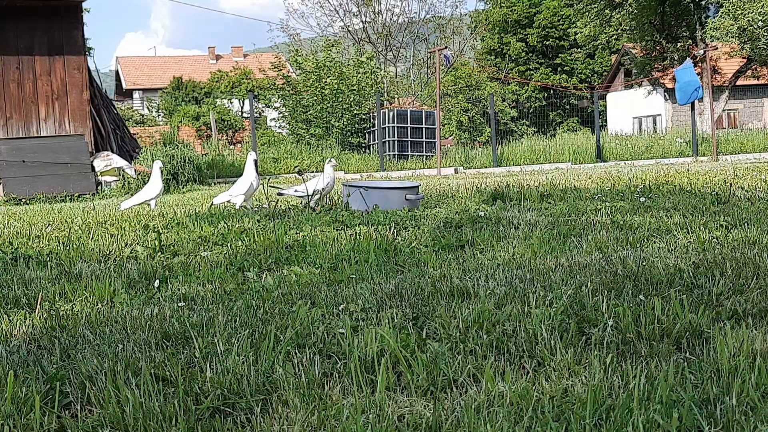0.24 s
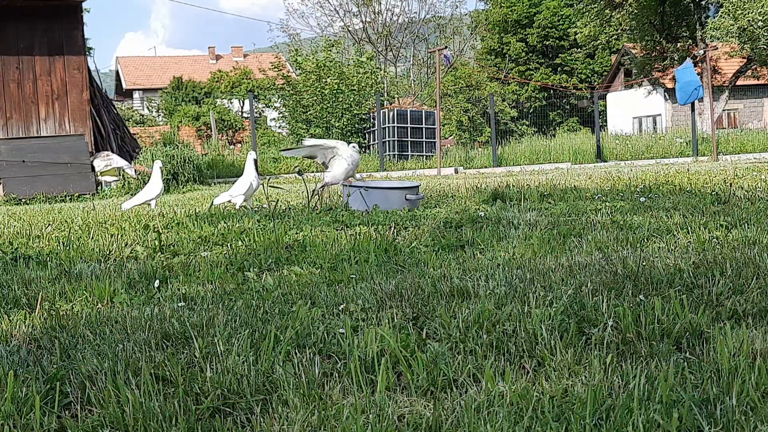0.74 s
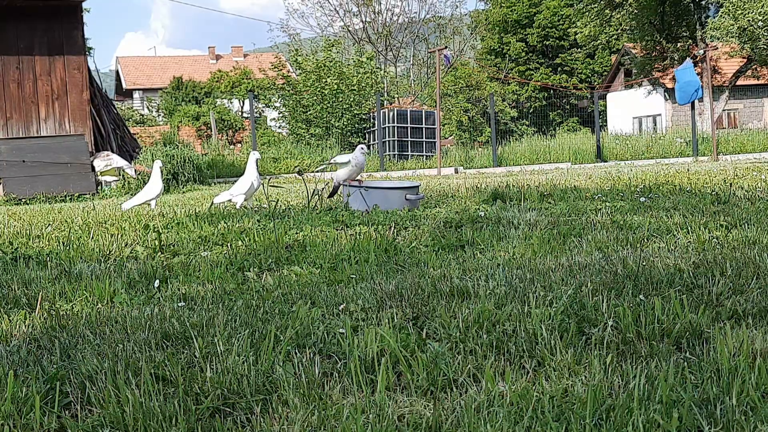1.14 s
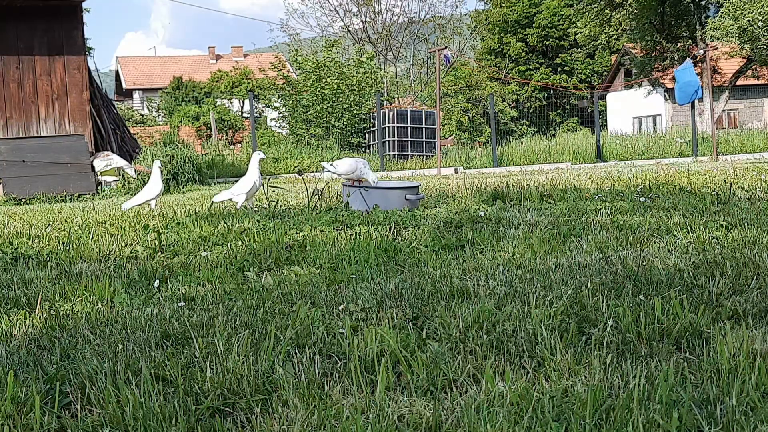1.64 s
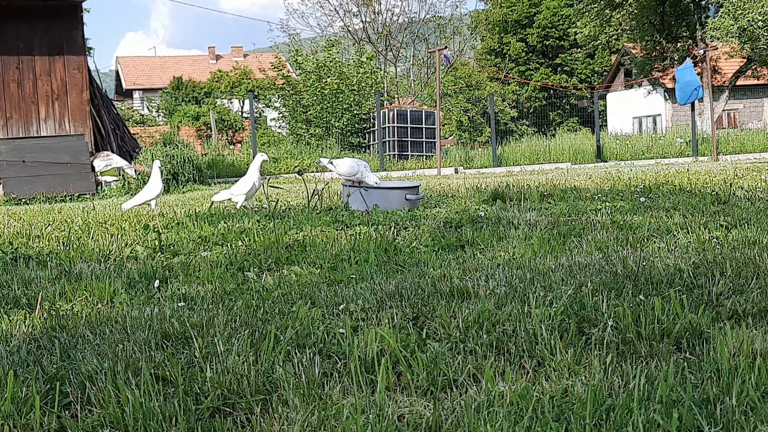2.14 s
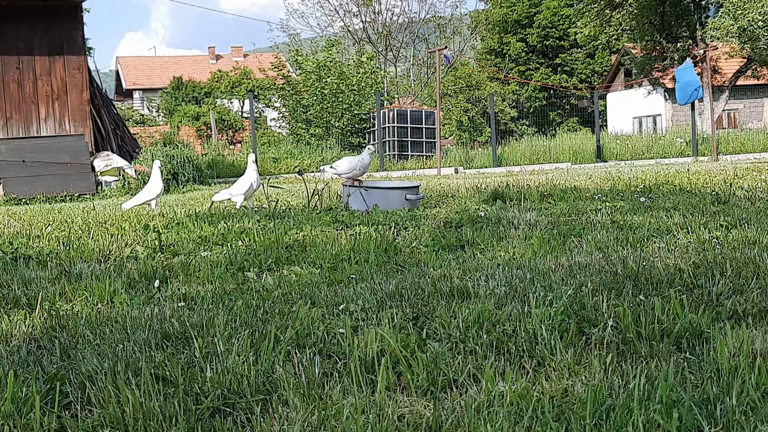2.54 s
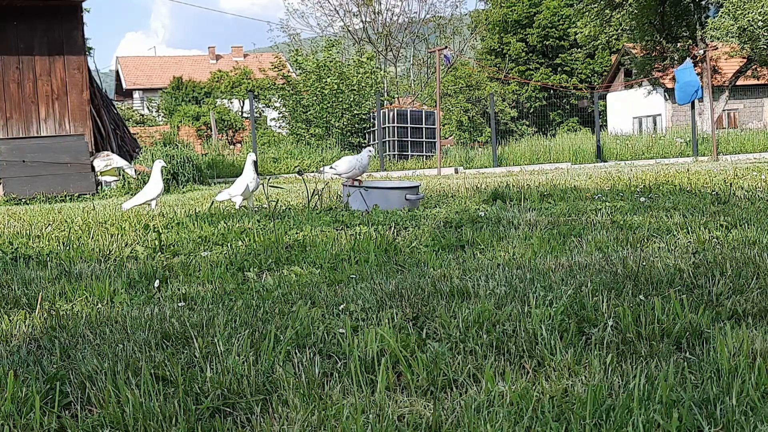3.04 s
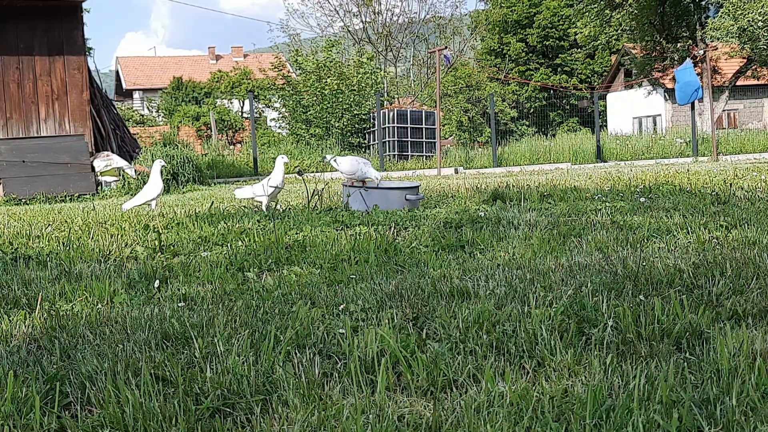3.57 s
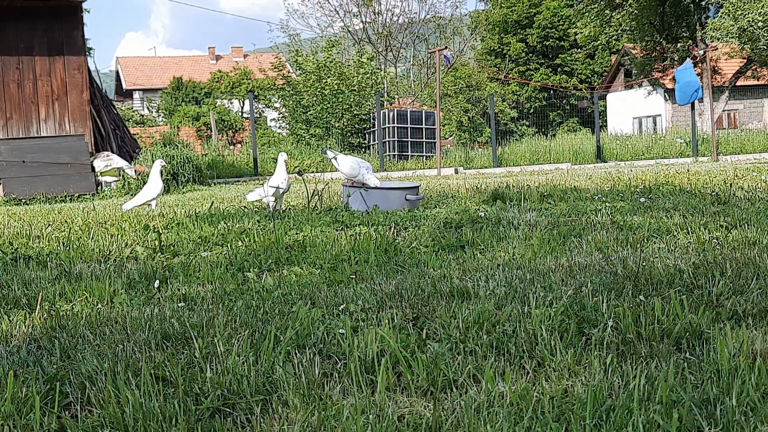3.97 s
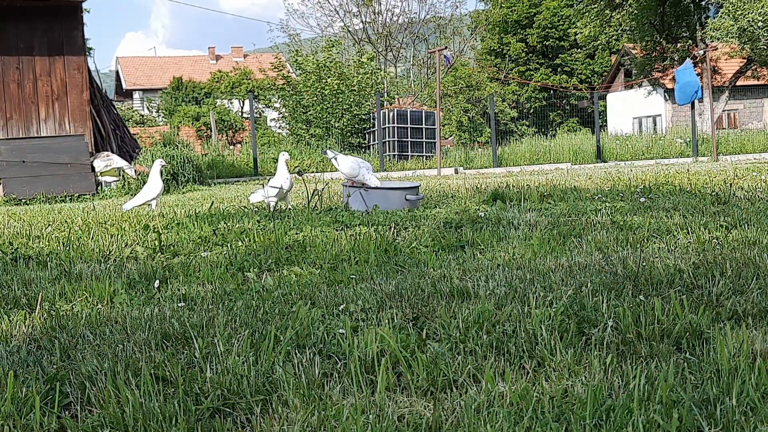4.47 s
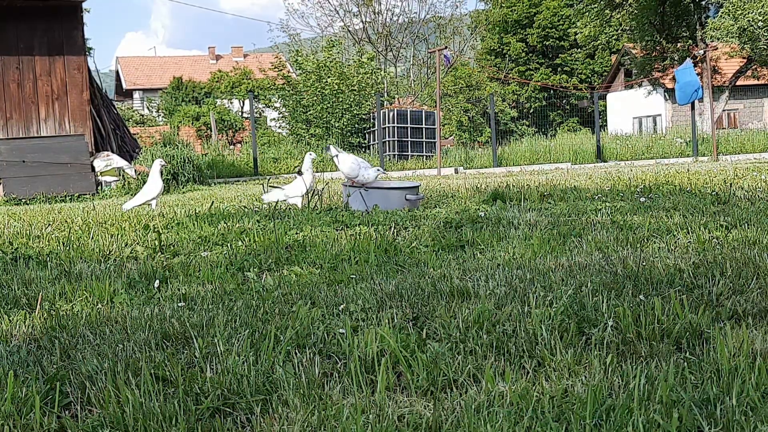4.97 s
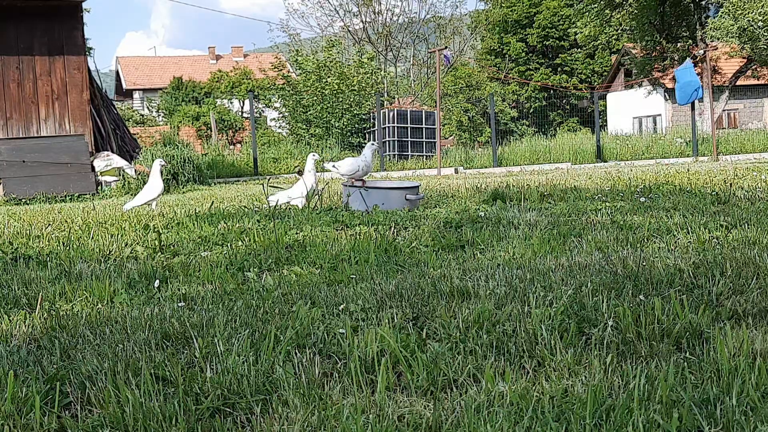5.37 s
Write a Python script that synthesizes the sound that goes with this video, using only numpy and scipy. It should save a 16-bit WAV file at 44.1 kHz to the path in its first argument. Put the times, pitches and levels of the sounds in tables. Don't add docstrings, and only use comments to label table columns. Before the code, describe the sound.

Two distant engines throb unevenly over a deep road rumble as pigeons make soft, low bumps and brief muffled coos. Faint crickets pulse on the left; a far songbird repeats a quick whistle on the right. A sparrow chirps at one and four seconds, grass snaps between them, a tub is knocked at mid-clip, then rustling and hollow thumps close it. Open yard, stereo phone microphone.

```python
import sys
import numpy as np
from scipy import signal
from scipy.fft import rfft, irfft
from scipy.io import wavfile
from scipy.ndimage import uniform_filter1d

SR = 44100
rng = np.random.default_rng(int(sys.argv[2]) if len(sys.argv) > 2 else 0)


def natural_amplitude(level_db):
    exponent = np.asarray(level_db, float) / 20
    return 10 ** exponent


def store_pcm(level_fs):
    pcm = np.round(np.clip(level_fs, -1, 1) * 32767).astype(np.int16)
    wavfile.write(sys.argv[1], SR, np.atleast_2d(pcm).T)


N = 247401
TIME = np.arange(N) / SR

# start in seconds, peak in dB, pitch in Hz.
BUMPS = [(0.35, -52.5, 287), (0.385, -61, 275), (0.734, -51.5, 335), (0.674, -52, 252), (0.832, -54, 249),
         (.57, -53, 286), (1.501, -52, 305), (1.808, -52, 294), (1.935, -52.5, 323), (1.934, -62, 402),
         (2.0, -53.5, 287), (2.202, -55, 452), (2.245, -54.5, 437), (2.47, -61.5, 420), (2.6, -54.5, 294),
         (2.78, -59.5, 290), (2.296, -52.5, 293), (3.129, -55, 289), (3.241, -56, 288), (3.35, -53, 397),
         (3.369, -63, 284), (3.389, -46.5, 284), (3.635, -52.5, 311), (4.01, -57.5, 315), (4.081, -71, 400),
         (4.129, -54, 265), (3.729, -45.5, 310), (4.367, -55, 290), (5.281, -62.5, 492),
         (5.309, -53.5, 271), (5.385, -58, 420), (5.57, -53, 318), (5.52, -55, 313.6)]
BUMP_CYCLES = 6.14
# start in seconds, length in seconds, level in dB, first and last pitch in Hz.
COOS = [
    (0.092, 0.07, -70, 288, 290),
    (0.166, 0.063, -61.5, 279, 313),
    (0.362, 0.066, -68, 308, 414),
    (0.743, 0.069, -63, 334, 445),
    (0.803, 0.074, -65, 448.5, 346),
    (1.432, 0.099, -68, 265, 301),
    (2.11, 0.104, -56, 352.7, 232.5),
    (2.205, 0.11, -59, 239.4, 275),
    (3.675, .07, -59.5, 292, 310),
]
# peak time in seconds, peak in dB, pitch in Hz, half-length in seconds, octave level in dB.
THUMPS = [
    (3.331, -44, 378, .007, -14),
    (3.439, -47, 322, .009, -23),
    (5.293, -53, 347, 0.0077, -25),
    (5.321, -52, 290, 0.0089, -25),
    (5.393, -50, 345, 0.0087, -29),
    (5.413, -52, 350, .007, -27),
    (5.501, -47.5, 315, 0.0093, -26),
]
# start in seconds, peak in dB, pitch in Hz.
KNOCK = [
    (3.324, -57, 700),
]

# time in seconds, pitch in Hz, level in dB, throat resonance in Hz, pitch scatter from 0 to 1.
CHIRPS = [
    [(.97, 1180, -82, 4300, .03), (.992, 1370, -63, 4400, .03), (1.009, 1580, -56, 4600, .022),
     (1.017, 1760, -57, 4100, .01), (1.028, 1780, -52, 3800, .008), (1.031, 1430, -53, 3900, .012),
     (1.038, 1330, -62, 3800, .03), (1.047, 1210, -59, 3700, .025), (1.067, 1370, -58, 4200, .016),
     (1.092, 1140, -62, 3100, .03), (1.112, 1100, -76, 2800, .04)],
    [(4.052, 1500, -80, 4900, .04), (4.07, 1500, -60, 4900, .032), (4.082, 1440, -57, 4700, .03),
     (4.1, 1530, -55, 4500, .022), (4.114, 1700, -55, 4200, .018), (4.127, 1420, -58, 3200, .02),
     (4.14, 1230, -61, 3300, .045), (4.158, 1300, -62, 3300, .05), (4.176, 1150, -60, 3000, .03),
     (4.2, 1150, -74, 3000, .05)],
    [(.915, 1300, -86, 2700, .01), (.925, 1450, -76, 3000, .01), (.94, 1850, -75, 3600, .01),
     (.96, 1750, -86, 3500, .02)],
]
CHIRP_WIDTH_HZ, CHEEP_WIDTH_HZ = 1300, 790
# share of its length, pitch over top pitch, level in dB.
CHEEP = [
    (0, .86, -6),
    (.15, .88, -2),
    (.55, 1.0, 0),
    (1, .92, -9),
]
# start in seconds, length in seconds, level in dB, top pitch in Hz,
# multiple of the pitch on which the throat rings.
CHEEPS = [
    (2.64, 0.12, -74, 1300, 3.0),
    (3.99, .06, -84, 1800, 3.0),
    (4.2, .06, -78, 1320, 2.5),
    (5.2, 0.12, -80, 1300, 3.0),
]
CHEEP_SCATTER, SPARROW_FIRST = .035, .5
SPARROW_RASP, SPARROW_BURR, BURR_HZ, SPARROW_HALF = .1, .3, 165, .35
SPARROW_BREATH_DB, BREATH_HZ, BREATH_WIDTH_HZ = -9, 4000, 3600
LINE_PATCHY_DB = 2.5
# frequency in Hz, left level in dB, right level in dB.
SHADE = [(1400, 3, 1), (2500, 4.5, -4), (3200, 2, 0), (3700, 0, 2), (4300, -1.5, 1), (4900, -5, -2.5),
         (6000, -7, -3)]
SHED_S = .066
# level in dB, for the left port and then the right.
SHED_DB = [
    [-8],
    [-17],
]

# seconds after its start, pitch in Hz, level in dB.
PHRASE = [
    (-.04, 4720, -23),
    (.02, 4900, -15.5),
    (.04, 5050, -7),
    (.053, 5600, -10),
    (.067, 4300, -6.5),
    (.08, 5270, 0),
    (.088, 4700, -29),
    (.098, 4370, -6),
    (.112, 4060, -16),
]
# start in seconds, level in dB.
SONGS = [
    (0.57, -65),
    (1.401, -63.5),
    (2.187, -67.5),
    (3.075, -70.5),
    (4.76, -72.5),
]
SONG_RASP = .4

# start in seconds, peak in dB.
CRICKET = [(-.065, -79), (0.1776, -80), (0.4391, -78.5), (0.7091, -78.5), (1.3599, -77.5), (1.5961, -77.5),
           (1.8656, -76.5), (2.0965, -79.5), (2.371, -78.5), (2.6382, -76.5), (2.9148, -77), (3.1894, -76),
           (3.472, -78), (3.7587, -76.5), (3.9988, -78), (4.3161, -77), (4.618, -80.5), (4.8983, -75.5),
           (5.1406, -77)]
# start in seconds, peak in dB.
CRICKET_FAR = [(0.0093, -80), (0.2803, -76), (0.7766, -77), (1.6194, -74), (1.8861, -78), (2.1176, -90),
               (2.5294, -80), (3.3194, -80), (3.5694, -77), (3.8494, -80), (4.801, -78), (4.9841, -77)]
CRICKET_WARMING_HZ_PER_S, CRICKET_RASP = 26, .22
CRICKET_FALL, CRICKET_HUM = .15, .3

# start in seconds, peak in dB, pitch in Hz, left minus right in dB.
TICKS = [(0.8789, -66, 12500, 4), (1.1223, -69, 10170, 7), (1.502, -67, 8000, 19), (1.5158, -57, 8100, 20),
         (1.525, -62, 8000, 15), (1.533, -61, 7800, 15), (1.538, -62, 7400, 15), (1.549, -71, 8000, 15),
         (1.57, -65, 10200, 9), (1.5775, -56, 12000, 13), (1.5985, -59, 10500, 8), (3.2959, -67, 5500, 2.5),
         (3.3173, -61, 12800, 6), (3.3278, -64, 11800, 4), (3.375, -68, 11800, 8), (4.0367, -67, 11500, 16),
         (4.418, -67, 10600, 10), (4.419, -60, 4300, 12), (4.981, -61.5, 6470, 14),
         (5.0793, -62.5, 10800, 19), (5.1947, -63, 13000, 12), (5.2141, -62, 7800, 19),
         (5.3034, -63, 8600, 16), (5.3604, -57.5, 8250, 25), (5.3602, -63, 12500, 11),
         (5.4341, -60.5, 9960, 21), (5.4644, -62, 8630, 15), (5.545, -65, 7240, 22)]
TICK_S, TICK_BROAD = .0016, .35
# time in seconds, level in dB.
RUSTLE = [
    [(0, -77), (.02, -94), (.05, -95)],
    [(1.49, -95), (1.515, -72), (1.55, -75), (1.6, -80), (1.68, -89)],
    [(3.28, -91), (3.324, -86), (3.38, -87), (3.45, -87)],
    [(3.56, -101), (3.6, -85), (3.8, -87.5), (3.95, -97)],
    [(4.03, -86), (4.12, -76), (4.25, -91)],
    [(4.95, -84), (4.985, -81), (5.02, -84), (5.075, -86), (5.085, -72.5), (5.13, -86), (5.19, -86)],
    [(5.19, -84), (5.224, -71.5), (5.27, -81), (5.33, -74), (5.375, -76), (5.395, -72), (5.45, -74),
     (5.48, -80)],
    [(5.48, -75), (5.545, -73.5), (5.575, -81.5), (5.61, -87)],
]
# pitch in Hz, width in Hz, level in dB.
BLADES = [(4870, 4000, 5.5), (7070, 2100, 1), (10100, 5200, -7), (12600, 6300, 1)]
BLADE_PATCHY_DB = 1.5
# time in seconds, level in dB.
SQUEAK = [
    (1.498, -92),
    (1.503, -86),
    (1.517, -66),
    (1.535, -82),
    (1.553, -85),
]
# pitch in Hz, width in Hz, level in dB.
STALK = [(3870, 470, -3.5), (8000, 270, 0), (10300, 420, -6)]

# time in seconds, level of the firing tone in dB,
# load as the level of the upper multiples over it in dB.
TRUCK = [(0, -41, -16), (.3, -50, -15.5), (.62, -44.5, -8), (1.0, -50, -14), (1.3, -62.5, -13),
         (1.6, -43.5, -16.5), (1.88, -48.5, -5), (2.12, -56.5, -7.5), (2.62, -50.5, -6.5),
         (2.83, -64.5, -7), (3.28, -49.5, -2), (3.45, -45.5, -24), (3.65, -44.5, -6), (4.02, -39.5, -18.5),
         (4.25, -54.5, 2), (4.65, -58.5, 0.5), (5.02, -42.5, 0), (5.61, -54.5, 10)]
# time in seconds, pitch in Hz.
TRUCK_HZ = [(0, 57.6), (2, 57), (4, 58), (5, 56.8), (5.61, 56.5)]
# time in seconds, depth in dB.
FADES = [(0.097, -36), (.26, -10), (.42, -20), (1.12, -5), (1.71, -41), (2.069, -3), (3.0, -5), (3.52, -13),
         (4.19, -28), (4.55, -6), (5.1, -5), (5.33, 0)]
TRUCK_THIRD_DB, TRUCK_THIRD_SHARE = -6, .85
# time in seconds, level of the firing tone in dB, 2nd multiple over it in dB.
TRACTOR = [(0, -68, -11), (.58, -71, 12), (1.09, -58.5, -12.5), (1.22, -73, 20), (1.38, -66, -4),
           (1.47, -59, 6), (1.64, -54.5, -24), (1.73, -58.5, -12), (1.94, -52, -21), (2.03, -57.5, -12),
           (2.4, -55, 2.5), (2.66, -53, -9), (2.82, -62, -1.5), (3.3, -53.5, 4.5), (3.55, -53.5, -3.5),
           (4.35, -54, 3.5), (4.66, -55, -1), (5.61, -50.5, -2.5)]
# multiple of the firing tone, level over that tone in dB.
TRACTOR_EXTRA = [(1.5, -10.5), (2.5, -14.5), (3, -18)]
# time in seconds, depth in dB.
TRACTOR_FADES = [(.13, -2), (.43, -18), (1.04, -20), (1.36, -9), (1.58, -17), (2.2, -7), (3.0, 5),
                 (3.9, -7), (2.78, 0), (4.22, -9), (4.66, -6), (5.5, 0)]
TRACTOR_HZ, FADE_S, TRACTOR_FADE_S, ENGINE_WET_DB = 93., .038, .025, -22

# time in seconds, level in dB, pitch in Hz.
TREAD = [
    (2.3, -85, 1010),
    (2.5, -74.5, 1010),
    (2.6, -67, 960),
    (2.69, -63, 910),
    (2.77, -75, 900),
    (2.87, -67.5, 950),
    (2.94, -75, 960),
    (3.01, -74, 950),
    (3.15, -80, 980),
]
TREAD_WIDTH_HZ = 230
# nearest time in seconds, roar in dB, half-time in seconds, hiss over roar in dB.
CARS = [
    (0.0, -81.5, 0.0062, 11),
    (1.04, -71.5, 0.024, -1),
    (1.45, -74, 0.086, -6.5),
    (2.1, -76, 0.51, 2.5),
    (2.85, -71, 0.39, -6),
    (3.3, -71, 0.16, -0.5),
    (3.82, -71.5, 0.2, 1.5),
    (4.12, -72, 0.11, 2),
    (4.7, -71.5, 0.53, -3.5),
    (5.55, -73, 0.15, 1.5),
]
BOOM_DB, BOOM_UNDER_BUMP_DB, BOOM_S = -77.5, -16.5, .097
# frequency in Hz, level in dB per Hz.
BOOM = [(120, -65), (230, -14.5), (310, -3), (430, -8.5), (520, -14), (900, -63)]
ROAR = [(300, -84), (600, -8.5), (820, -7.5), (940, -4.5), (1080, -2.5), (1400, -15), (3000, -80)]
HISS = [(500, -70), (1000, -13), (1400, -2), (1700, -3.5), (2300, -12.5), (3000, -23), (5000, -50)]
# frequency in Hz, level in dB per Hz.
RUMBLE = [(15, -51), (25, -25), (59, 1), (86, -2.5), (179, -3.5), (199, -5.5), (230, -18.5), (289, -9),
          (372, -24), (600, -28.5), (780, -39), (1320, -120)]
# frequency in Hz, level in dB per Hz.
AIR = [(260, -24), (450, -2.5), (682, -5), (1020, -1), (1330, -5.5), (1660, -6), (3050, -23.5), (3590, -19),
       (3980, -21), (4480, -20), (5120, -24.5), (5590, -24.5), (9680, -28), (13400, -22), (15600, -23.5)]
RUMBLE_DB, RUMBLE_FLICKER_DB, AIR_DB = -54.5, 1.5, -70.5
# frequency in Hz, likeness from 0 to 1.
ALIKE = [(60, 0.94), (130, 0.95), (290, 0.74), (640, 0.44), (1400, 0.51), (2400, 0.12), (4000, 0.37),
         (8000, 0)]
# frequency in Hz, left minus right in dB.
LEAN = [(60, 11.5), (110, 4), (200, 5.5), (380, 4), (700, -4), (1290, 2), (2380, 8.5), (4400, 0.5),
        (8120, 1.5), (15000, 1.5)]
# frequency in Hz, lead in milliseconds.
PORT_LAG = [(100, 0.16), (430, 0.3), (1200, 0.43), (2400, 0.418)]


def band(x, hz, width_hz):
    edges = [hz - width_hz / 2, min(hz + width_hz / 2, .49 * SR)]
    return signal.sosfilt(signal.butter(1, edges, "band", fs=SR, output="sos"), x)


def lowpass(x, hz):
    return signal.sosfilt(signal.butter(2, hz, fs=SR, output="sos"), x)


def unit(x):
    return x / np.sqrt(np.mean(x ** 2))


def sine(hz):
    return np.sin(2 * np.pi * np.cumsum(hz) / SR)


def sides(pan_db):
    return natural_amplitude(np.array([[pan_db], [-pan_db]]) / 2)


def walk(rate):
    k = int(SR / rate)
    held = np.repeat(rng.standard_normal(N // k + 1), k)
    return 1.503 * uniform_filter1d(uniform_filter1d(held, k), k)[:N]


def rasp(rate_hz, share):
    return 1 - share + share * walk(rate_hz)


def curves(table):
    s, *columns = np.transpose(table)
    return [np.interp(TIME, s, c) for c in columns]


def sung(table, s0=0.):
    s, *columns = np.transpose(table)
    t = np.arange(s[0], s[-1], 1 / SR)
    return s0 + s[0], t, [np.interp(t, s, c) for c in columns]


def over(hz, table):
    table = np.array(table)
    return np.interp(np.log(hz + 1), np.log(table[:, 0]), table[:, 1])


def add(out, s, piece):
    i = int(s * SR)
    out[..., i:i + piece.shape[-1]] += piece[..., :N - i]


def place(x, pan_db, lag_ms, wet_db, t60):
    t = np.arange(int(.5 * SR)) / SR
    noise = rng.standard_normal((2, len(t)))
    dull = lowpass(noise, 4200)
    tail = dull + (noise - dull) * np.exp(-t / .076)
    tail = tail * np.exp(-np.log(1000) * t / t60) * (t > .006)
    tail *= natural_amplitude(wet_db) / np.sqrt(np.sum(tail ** 2, axis=1, keepdims=True))
    late = np.interp(TIME - abs(lag_ms) / 1000, TIME, x)
    direct = np.array([late, x] if lag_ms > 0 else [x, late]) * sides(pan_db)
    return direct + signal.fftconvolve(x[None], tail, axes=1)[:, :N]


def diffuse(colour):
    hz = np.fft.rfftfreq(N, 1 / SR)
    alike = np.clip(over(hz, ALIKE), 0, 1)
    lean = natural_amplitude(over(hz, LEAN) / 2)
    left, other = rfft(rng.standard_normal((2, N))) * natural_amplitude(over(hz, colour))
    lag = np.exp(-2j * np.pi * hz * over(hz, PORT_LAG) / 1000)
    right = alike * left * lag + np.sqrt(1 - alike ** 2) * other
    return unit(irfft(np.array([left * lean, right / lean]), N))


def bumps():
    out, t = np.zeros(N), np.arange(int(.2 * SR)) / SR
    for s, db, hz in BUMPS:
        length = BUMP_CYCLES / hz
        shape = np.e * t / length * 2 * np.exp(-2 * t / length)
        tone = shape * np.sin(2 * np.pi * hz * t)
        overtone = .089 * shape ** 2 * np.sin(2 * np.pi * 2.1 * hz * t)
        add(out, s, natural_amplitude(db - 2) * (tone + overtone))
    return out


def coos():
    out = np.zeros(N)
    for s, length, db, from_hz, to_hz in COOS:
        share = np.arange(0, 1, 1 / (length * SR))
        turn = 2 * np.pi * np.cumsum(from_hz + (to_hz - from_hz) * share) / SR
        swell = np.sin(np.pi * share) ** .33
        add(out, s, natural_amplitude(db + 3.5) * swell * (np.sin(turn) + .064 * np.sin(2 * turn)))
    return out * rasp(90, .35)


def thumps():
    out = np.zeros(N)
    for s, db, hz, half, octave_db in THUMPS:
        turn = 2 * np.pi * hz * (TIME - s)
        swell = np.exp(-((TIME - s) / half) ** 2)
        out += natural_amplitude(db) * swell * (np.sin(turn) + natural_amplitude(octave_db) * np.sin(2 * turn))
    return out


def pigeons():
    return place(bumps() + coos() + thumps(), 4.6, -.26, -10, .11)


def knock():
    out, t = np.zeros(N), np.arange(int(.06 * SR)) / SR
    for s, db, hz in KNOCK:
        burst = rng.standard_normal(len(t)) * t / .0044 * np.exp(1 - t / .0045)
        add(out, s, natural_amplitude(db + 14.5) * band(band(burst, hz, 720), hz, 700))
    return place(out, 3.4, -.34, -2, .36)


def calls():
    loud = [[row + (CHIRP_WIDTH_HZ,) for row in chirp] for chirp in CHIRPS]
    soft = []
    for s, length, db, top_hz, ring in CHEEPS:
        soft.append([(s + share * length, top_hz * pitch, db + gain_db, ring * top_hz * pitch,
                      CHEEP_SCATTER, CHEEP_WIDTH_HZ) for share, pitch, gain_db in CHEEP])
    return loud + soft


def sparrow_voice():
    out = np.zeros(N)
    for call in calls():
        s, t, (hz, db, throat_hz, scatter, width_hz) = sung(call)
        n = len(t)
        hz = hz * (1 + scatter * walk(400)[:n])
        turn = 2 * np.pi * np.cumsum(hz) / SR + .11 * np.sin(2 * np.pi * BURR_HZ * t)
        half_line = SPARROW_HALF * (throat_hz / 4000) ** 3 * (scatter / .031) ** 2
        voice = SPARROW_FIRST * np.sin(turn)
        for k in np.arange(2, 13) / 2:
            throat = .013 + 1 / (1 + ((k * hz - throat_hz) / width_hz) ** 4)
            line = np.sin(k * turn) * natural_amplitude(LINE_PATCHY_DB * walk(219)[:n]) * throat
            voice = voice + line * (half_line if k % 1 else 1)
        breath = rng.standard_normal(n)
        for _ in range(3):
            breath = band(breath, BREATH_HZ, BREATH_WIDTH_HZ)
        voice = voice + natural_amplitude(SPARROW_BREATH_DB) * unit(breath)
        add(out, s, natural_amplitude(db) * voice * (1 + SPARROW_BURR * np.sin(2 * np.pi * BURR_HZ * t + 1)))
    return out * rasp(500, SPARROW_RASP)


def sparrow():
    x = place(sparrow_voice(), -3.5, .404, -9.5, .38)
    echo = natural_amplitude(np.array(SHED_DB)) * np.roll(x, int(SHED_S * SR), axis=1)
    hz, *ports = np.transpose(SHADE)
    bins = np.fft.rfftfreq(N, 1 / SR)
    colour = natural_amplitude(np.array([over(bins, np.transpose([hz, db])) for db in ports]))
    return irfft(rfft(x + echo) * colour, N)


def songbird():
    out = np.zeros(N)
    for (start, level_db), vary in zip(SONGS, rng.standard_normal(len(SONGS))):
        s, t, (hz, db) = sung(PHRASE, start)
        trill = 1 + .068 * (t < .065) * np.sin(2 * np.pi * 95 * t)
        add(out, s, natural_amplitude(level_db + db) * sine(hz * (1 + .0058 * vary) * trill))
    return place(out * rasp(450, SONG_RASP), -10.5, .24, -1.5, .49)


def cricket(chirps, song_hz, span, stroke_hz, rise, scatter):
    out, t = np.zeros(N), np.arange(int(.3 * SR)) / SR
    stroke = t * stroke_hz % 1
    swell = np.clip(.36 + t / rise, 0, 1) * np.clip((span - t) / .12, 0, 1)
    for (s, db), chance in zip(chirps, rng.standard_normal((len(chirps), 2, 12))):
        size, tune = chance[:, (t * stroke_hz).astype(int)]
        gate = (CRICKET_HUM + np.sin(np.pi * np.clip(stroke / .55, 0, 1)) ** 2) * natural_amplitude(size)
        hz = (song_hz + CRICKET_WARMING_HZ_PER_S * s) * (1.04 - CRICKET_FALL * stroke + scatter * tune)
        chirp = natural_amplitude(db + 3) * gate * swell * sine(hz)
        add(out, max(s - .006, 0), chirp[int(max(-s, 0) * SR):])
    return out * rasp(750, CRICKET_RASP)


def crickets():
    near = place(cricket(CRICKET, 4500, .2, 27.5, .09, .007), 10, -.3, .5, .24) * 1.3
    return near + place(cricket(CRICKET_FAR, 4840, .094, 30.5, .042, .0044), 14, -.098, 3.3, .22)


def grass():
    out, t = np.zeros((2, N)), np.arange(int(.055 * SR)) / SR
    for s, db, hz, pan_db in TICKS:
        decay = np.exp(-t / TICK_S) + .12 * np.exp(-t / .02)
        burst = rng.standard_normal(len(t)) * np.clip(t / .00088, 0, 1) * decay
        crack = band(band(burst, 8700, 10000), 8700, 10000)
        snap = TICK_BROAD * crack + .65 * band(burst, hz, .15 * hz)
        add(out, s, natural_amplitude(db - 4) * snap / np.abs(snap).max() * sides(pan_db))
    level = np.zeros(N)
    for patch in RUSTLE:
        s, t, (db,) = sung(patch)
        add(level, s, natural_amplitude(db + 1))
    grain_db = np.repeat(rng.exponential(size=N // 40 + 1), 40)[:N]
    grains = rng.standard_normal((2, N)) * natural_amplitude(grain_db)
    leaves = [natural_amplitude(db + BLADE_PATCHY_DB * walk(30)) * band(grains, hz, width) for hz, width, db in BLADES]
    return out + unit(sum(leaves)) * level * sides(7)


def squeak():
    out = np.zeros(N)
    s, t, (db,) = sung(SQUEAK)
    rub = rng.standard_normal(len(t)) * natural_amplitude(db + 2.4 * np.sin(2 * np.pi * 110 * t))
    add(out, s, sum(natural_amplitude(gain_db + 10) * band(rub, hz, width) for hz, width, gain_db in STALK))
    return out * sides(10)


def drone(hz, orders, wobble_db, blur):
    turn = 2 * np.pi * np.cumsum(hz) / SR
    out = np.zeros(N)
    for k, db in orders:
        level = np.sqrt(2) * natural_amplitude(db + wobble_db * walk(25))
        out += level * np.sin(k * turn + blur * walk(9))
    return out


def fading(fades, width_s):
    return sum(db * np.exp(-((TIME - s) / width_s) ** 2) for s, db in fades)


def truck():
    level_db, load_db = curves(TRUCK)
    third_db = level_db + TRUCK_THIRD_SHARE * load_db + TRUCK_THIRD_DB
    orders = [(1, level_db + fading(FADES, FADE_S)), (2, level_db + load_db), (3, third_db)]
    return place(drone(curves(TRUCK_HZ)[0], orders, 1.6, .7), 1.5, -.6, ENGINE_WET_DB, .2)


def tractor():
    first_db, load_db = curves(TRACTOR)
    load_db = load_db + fading(TRACTOR_FADES, TRACTOR_FADE_S)
    orders = [(1, first_db), (2, first_db + load_db)]
    orders += [(k, first_db + db) for k, db in TRACTOR_EXTRA]
    return place(drone(np.full(N, TRACTOR_HZ), orders, 2.03, .77), 2.6, -.478, ENGINE_WET_DB, .1)


def tread():
    db, hz = curves(TREAD)
    flutter = unit(lowpass(rng.standard_normal(N), TREAD_WIDTH_HZ / 2))
    hum = unit((.6 + flutter) * sine(hz)) * natural_amplitude(db + 1.5 * walk(60))
    return place(hum, 1.4, -.12, -8.5, .22)


def near(s, half):
    return 1 / (1 + ((TIME - s) / half) ** 2)


def traffic():
    boom = natural_amplitude(BOOM_DB) ** 2
    boom = boom + sum(natural_amplitude(db + BOOM_UNDER_BUMP_DB) ** 2 * near(s, BOOM_S) ** 2 for s, db, _ in BUMPS)
    roar = sum(natural_amplitude(db) ** 2 * near(s, half) for s, db, half, _ in CARS)
    hiss = sum(natural_amplitude(db + over_db) ** 2 * near(s, half) for s, db, half, over_db in CARS)
    return 10 * np.log10([boom, roar, hiss])


def road():
    boom_db, roar_db, hiss_db = traffic()
    rumble = diffuse(RUMBLE) * natural_amplitude(RUMBLE_DB + RUMBLE_FLICKER_DB * walk(9))
    boom = diffuse(BOOM) * natural_amplitude(boom_db + 1.5 + 1.83 * walk(25.12))
    roar = diffuse(ROAR) * natural_amplitude(roar_db + 3.5 + 1.26 * walk(14))
    hiss = diffuse(HISS) * natural_amplitude(hiss_db + 3.5 + .93 * walk(14))
    air = diffuse(AIR) * natural_amplitude(AIR_DB + .11 * walk(2.6))
    return rumble + boom + roar + hiss + air


def scene():
    birds = pigeons() + knock() + sparrow() + songbird()
    plants_and_insects = crickets() + grass() + squeak()
    return birds + plants_and_insects + truck() + tractor() + tread() + road()


def top_cut(x):
    return signal.sosfilt(signal.butter(12, 15710, fs=SR, output="sos"), x)


def record(dry):
    mix = signal.sosfilt(signal.ellip(8, .2, 50, 15750, fs=SR, output="sos"), dry)
    mix = signal.sosfilt(signal.butter(4, 42, "high", fs=SR, output="sos"), mix)
    return top_cut(mix)


dry = scene()
out = record(dry)
store_pcm(out)
```